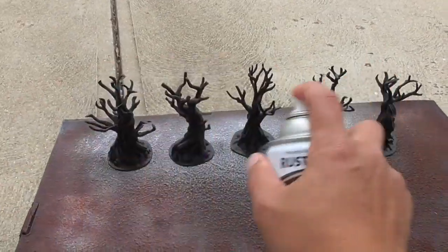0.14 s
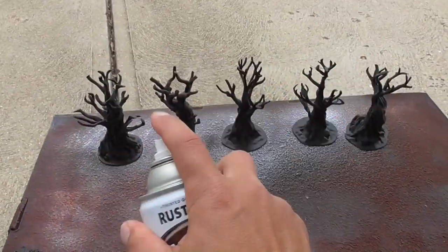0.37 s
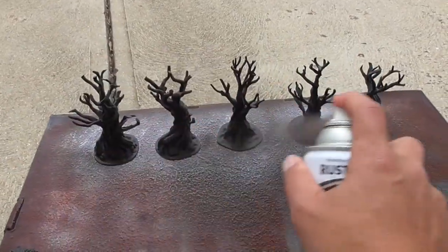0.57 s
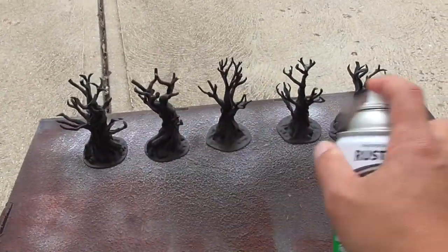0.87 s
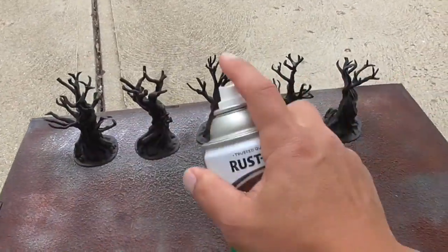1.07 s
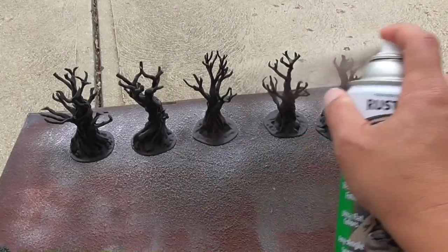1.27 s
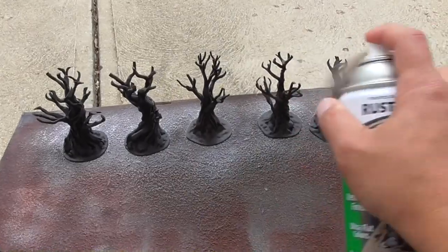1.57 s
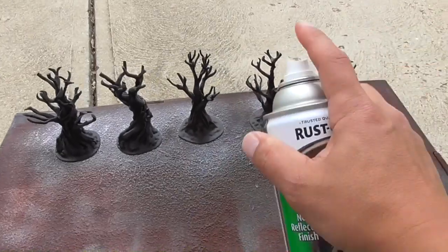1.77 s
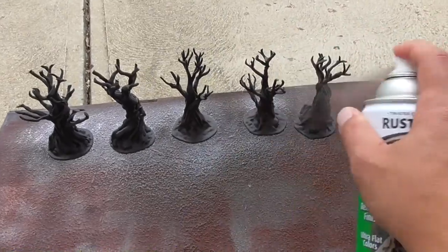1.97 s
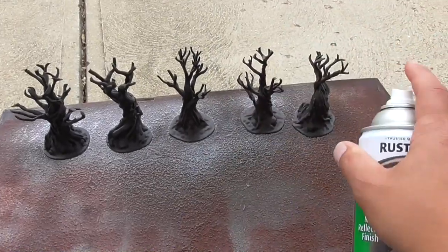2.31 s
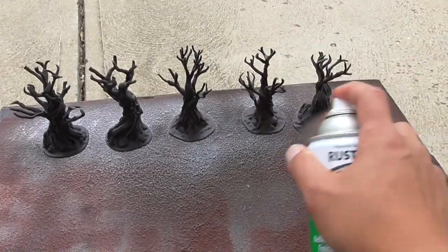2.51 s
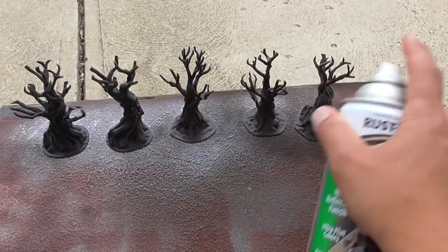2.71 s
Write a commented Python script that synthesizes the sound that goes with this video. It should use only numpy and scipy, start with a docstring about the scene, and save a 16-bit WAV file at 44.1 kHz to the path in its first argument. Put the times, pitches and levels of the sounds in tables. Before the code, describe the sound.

Aerosol paint can hisses in seven short, bright bursts close by outdoors, over distant low rumble

```python
"""Seven short aerosol bursts hiss close by outdoors, over a distant rumble and a thin insect-like treble.
The jet is coloured noise under the valve's envelope; moving reflections off the board comb it.
Valve and finger ticks are resonant noise puffs; a weak hiss weeps on after each burst.
Machinery and traffic are low noise with fuzzy tones and swelling bands; air, insects and crackle
are flickering treble noise. A camera picks it all up with limited bandwidth."""
import sys
import numpy as np
from scipy import signal
from scipy.fft import rfft, irfft, next_fast_len
from scipy.io import wavfile
from scipy.ndimage import uniform_filter1d, map_coordinates

SR = 44100
rng = np.random.default_rng(int(sys.argv[2]) if len(sys.argv) > 2 else 0)


def digitize_waveform(pressure):
    """Quantize a signal to 16-bit integers and store it at the path in sys.argv[1].

    Rows of a 2-D input are taken as channels; values are limited to [-1, 1].
    """
    field = np.atleast_2d(pressure).T
    bounded = np.clip(field, -1, 1)
    quanta = np.round(bounded * 32767).astype(np.int16)
    wavfile.write(sys.argv[1], SR, quanta)


N = 125685
T = np.arange(N) / SR
HALVES = np.array([[0.5], [-0.5]])  # splits a left-minus-right difference over the two channels

# Valve action: (fully open [s], starts to shut [s], level [dB], sag by then [dB], opening step [s],
# after-hiss level [dB], after-hiss t60 [s], after-hiss length [s], bright band boost [dB])
BURSTS = [(0.187, 0.366, -28, -0.5, 0.023, -51, 2, 0.12, 2),
          (0.533, 0.719, -26.5, -4.5, 0.019, -52, 0.39, .3, 0),
          (0.921, 1.092, -28.5, 0, 0.023, -52.5, 1.8, .13, 0.1),
          (1.24, 1.418, -27, -4.5, 0.014, -47.5, 0.39, 0.35, -1),
          (1.616, 1.778, -28, -1.5, 0.015, -52.5, 0.88, .3, -0.4),
          (1.947, 2.091, -27, -5, 0.0084, -49, 0.31, .3, 0.5),
          (2.517, 2.66, -29.5, -1, 0.014, -51.5, .4, .3, 0.5)]
# Stereo likeness of the low background: (frequency [Hz], left-right correlation [-1..1])
RUMBLE_ALIKE = [(60, 0.96), (150, 1), (380, 0.918), (950, 0.69), (2380, 0.83), (9000, 0.18)]


def amp(db):
    """dB to gain."""
    return 10 ** (np.asarray(db) / 20)


def unit(x):
    """Scale to rms 1."""
    return x / np.sqrt(np.mean(x ** 2) + 1e-20)


def along(points, hz, **ends):
    """Interpolate (Hz, value) points on a log-frequency axis."""
    f, v = np.transpose(points)
    return np.interp(np.log(hz + 1), np.log(f + 1), v, **ends)


def curves(rows):
    """One value per sample for each column after the time."""
    time_s, *columns = np.transpose(rows)
    return [np.interp(T, time_s, column) for column in columns]


def wobble(knots_per_s):
    """Smooth random curve: a cubic spline through normal draws."""
    knots = rng.standard_normal(int(N * knots_per_s / SR) + 4)
    return map_coordinates(knots, [T * knots_per_s])


def filtered(x, response):
    """Multiply the spectrum of x by a complex response of frequency."""
    size = next_fast_len(x.shape[-1] + 8192)
    spectrum = rfft(x, size) * response(np.fft.rfftfreq(size, 1 / SR))
    return irfft(spectrum, size)[..., :x.shape[-1]]


def peak(hz, width_hz):
    """Response of a second-order resonance, unity at its centre."""
    return lambda f: 1j * f * width_hz / (hz * hz - f * f + 1j * f * width_hz)


def shape(points):
    """Gain of a (Hz, dB) spectrum that falls away beyond its ends."""
    foot = (points[0][0] * 0.51, -60)
    return lambda hz: amp(along([foot] + list(points), hz, right=-120))


def rush(gain, alike, patchy_db):
    """Stereo noise of rms 1: random time-frequency patches, then colour and left-right correlation."""
    z = signal.stft(rng.standard_normal((2, N)), nperseg=512)[2]
    patches = uniform_filter1d(rng.standard_normal(z.shape[1:]), size=5, axis=0)
    patches = uniform_filter1d(patches, size=8, axis=1)
    pair = signal.istft(z * amp(patchy_db * unit(patches)), nperseg=512)[1][:, :N]

    def mid_side_gain(hz):
        """Mid and side gains whose balance sets the correlation."""
        angle = np.arccos(np.clip(along(alike, hz), -1, 1)) / 2
        return gain(hz) * np.array([np.cos(angle), np.sin(angle)])

    mid, side = filtered(pair, mid_side_gain)
    return unit(np.array([mid + side, mid - side]))


def band(hz, width_hz):
    """Narrow stereo noise through two equal resonances, each width_hz wide."""
    return rush(lambda f: peak(hz, width_hz)(f) ** 2, RUMBLE_ALIKE, patchy_db=0.3)


def rumble():
    """Distant machinery and traffic: slowly wavering low noise."""
    # (frequency [Hz], relative density [dB per Hz])
    rumble_points = [(15, -45), (25, -16), (59, -7), (200, -2.5), (256, -5), (353, -4), (435, -6.5),
                     (516, -12), (600, -9), (797, -9), (844, -10.5), (1000, -12), (1190, -14),
                     (1350, -15.5), (1760, -30.5), (2300, -30.5), (2990, -66), (5060, -120)]
    level_db = -40 + 0.31 * wobble(3.1)
    return amp(level_db) * rush(shape(rumble_points), RUMBLE_ALIKE, patchy_db=0.25)


def drones():
    """Fuzzy tones in the rumble: narrow noise bands, each wavering in level."""
    # (frequency [Hz], width of each resonance [Hz], level [dB])
    drone_rows = [(68.9, 8.1, -53), (118.5, 6.8, -53.5), (856, 35, -55), (450.2, 16, -53)]
    out = np.zeros((2, N))
    for hz, width_hz, db in drone_rows:
        out += amp(db + 0.31 * wobble(4.26)) * band(hz, width_hz)
    return out


def swells():
    """Two low noise bands that swell and sink along set level curves."""
    # (frequency [Hz], width of each resonance [Hz], offset to its level curve [dB])
    swell_bands = [(189.7, 74, -1), (323, 86, -1.5)]
    # (time [s], lower band level [dB], upper band level [dB])
    swell_levels = [(0, -45, -46.5), (.4, -42.5, -43), (.57, -40, -43.5), (.8, -46, -50.5),
                    (1.15, -43, -59), (1.26, -41.5, -45), (1.56, -47.5, -49.5), (1.85, -45.5, -40),
                    (2.2, -44, -40.5), (2.45, -54, -42), (2.66, -42.5, -44.5), (2.85, -52, -45.5)]
    out = np.zeros((2, N))
    for (hz, width_hz, offset_db), level_db in zip(swell_bands, curves(swell_levels)):
        out += amp(offset_db + level_db) * band(hz, width_hz)
    return out


def air():
    """Thin, wavering air hiss."""
    # (frequency [Hz], relative density [dB per Hz])
    air_points = [(1060, -42), (1800, -10.5), (2450, -8.5), (2940, -10.5), (3720, -3.5), (4150, -10),
                  (5810, -10.5), (6540, -4), (7430, -3.5), (8590, -3.5), (9580, -4), (10600, -12),
                  (15800, -20)]
    # (frequency [Hz], left-right correlation [-1..1])
    air_alike = [(1500, 0.8), (3600, 0.8), (6000, .6), (8600, -0.4), (15000, -0.4)]
    level_db = -59 + 0.7 * wobble(4.2)
    return amp(level_db) * rush(shape(air_points), air_alike, patchy_db=1.5)


def insects():
    """Insect-like treble: two noise bands that follow level curves and flicker."""
    # (frequency [Hz], width of each resonance [Hz])
    insect_bands = [(3550, 550), (8620, 380)]
    # (time [s], low band level [dB], high band level [dB])
    insect_levels = [(0, -69, -58), (.15, -69, -65), (.45, -64, -67), (.78, -70, -72), (.88, -65, -58),
                     (1.17, -64, -61), (1.5, -65.5, -74), (1.58, -62.5, -63), (1.83, -65, -64),
                     (1.92, -61, -56), (2.2, -62.5, -60.5), (2.33, -66.5, -72), (2.46, -68, -59),
                     (2.72, -69, -61), (2.85, -66, -66)]
    flicker_db = 1.2
    out = np.zeros((2, N))
    for (hz, width_hz), level_db in zip(insect_bands, curves(insect_levels)):
        out += amp(level_db + flicker_db * wobble(10)) * band(hz, width_hz)
    return out


def crackle():
    """Faint treble crackle: very patchy resonant noise with fast level spikes."""
    hz, width_hz = 10600, 4500
    level_db, spikes_db = -68.5, 3.5
    noise = rush(lambda f: peak(hz, width_hz)(f) ** 2, [(1000, 0.36)], patchy_db=-7)
    return amp(level_db + spikes_db * wobble(140)) * noise


def background():
    """Sum of the low and treble outdoor layers."""
    return rumble() + drones() + swells() + air() + insects() + crackle()


def ticks():
    """Small valve and finger clicks: decaying noise in a broad resonance plus a bright edge."""
    # (start [s], peak level before panning [dB], frequency [Hz], resonance width over frequency [ratio])
    tick_rows = [(0.1386, -48, 9500, 0.42), (0.464, -38, 4800, .6), (0.5165, -23, 4150, 3),
                 (0.8917, -34.5, 4250, 0.16), (1.2204, -40, 4000, 1.1), (1.8482, -42, 8800, .3),
                 (1.914, -49.5, 4300, .3), (2.41, -52, 11000, .4), (2.449, -43, 9250, .4),
                 (2.515, -29, 4250, .12), (2.782, -51, 10300, .25), (2.812, -50, 11000, .4)]
    t60_s, rise_s = 0.023, 0.0005
    snap_db, snap_hz, snap_width_hz = -10, 8800, 5000
    t = T[:2048]
    out = np.zeros(N + len(t))
    snap = peak(snap_hz, snap_width_hz)
    for start_s, db, hz, width_ratio in tick_rows:
        puff = rng.standard_normal(len(t)) * amp(-60 * t / t60_s) * (1 - np.exp(-t / rise_s))
        body = peak(hz, width_ratio * hz)
        click = filtered(puff, lambda f: body(f) ** 2 + amp(snap_db) * snap(f) ** 2)
        out[round(start_s * SR):][:len(t)] += amp(db) * click / np.abs(click).max()
    return out[:N] * amp([[-1.2], [1.2]])  # a little to the right


def valve():
    """Flow gain: the valve cracks, opens with a surge, sags, eases off, shuts and weeps."""
    cracked_db, surge_db, surge_s = -26, 1, 0.023
    taper_s, taper_db = 0.017, -8.5  # finger easing off
    shut_s, shut_db = 0.013, -35  # valve closing
    gain = np.zeros(N)
    for on, off, db, sag, rise, after_db, t60, weep_s, _ in BURSTS:
        eased = off + taper_s
        times = [on - 2 * rise, on - rise, on, off, eased, eased + shut_s, off + 0.047]
        levels = [-70, cracked_db, 0, sag, sag + taper_db, sag + shut_db, -70]
        line_db = np.interp(T, times, levels)
        line_db += surge_db * np.exp(-np.abs(T - on) / surge_s)
        gain += amp(db + line_db) * (line_db > -69)
        weep = amp(after_db - 60 * np.maximum(T - off, 0) / t60) * (T > off)
        gain += weep * np.clip((off + weep_s - T) / 0.014, 0, 1)
    return gain


def jet():
    """Direct hiss: turbulent noise under the valve gain, with a bright band set per burst."""
    # (frequency [Hz], relative density [dB per Hz])
    jet_points = [(880, -11.5), (1500, -16), (1790, -19.5), (2140, -10), (2430, -18), (2700, -11),
                  (3070, -14.5), (3670, -9.5), (4330, -7), (5430, -9.5), (5880, -8.5), (6360, -7.5),
                  (6950, -4.5), (8370, 2), (10600, -1.5), (12600, -4), (15700, -14)]
    # (frequency [Hz], left-right correlation [-1..1])
    jet_alike = [(2000, 1.0), (4000, 0.96), (6500, 0.92), (9400, 0.35), (12000, 1), (15000, 0.32)]
    bright_hz, bright_width_hz = 11600, 3500
    flutter_db = 0.27 * wobble(39.8) + 0.15 * wobble(150)
    hiss = valve() * amp(flutter_db) * rush(shape(jet_points), jet_alike, patchy_db=1.22)
    rows = np.array(BURSTS)
    bright_db = np.interp(T, rows[:, :2].ravel(), rows[:, -1].repeat(2))
    return hiss + (amp(bright_db) - 1) * filtered(hiss, peak(bright_hz, bright_width_hz))


def reflections(direct):
    """Three echoes off board, hand and figures: coloured, phase-turned copies with gliding delays."""
    # (frequency [Hz], gain [dB])
    board_colour = [(2000, -3), (3500, -2), (5300, 2.5), (7500, 2), (9500, 3.5), (11500, -1.5), (15000, 0)]
    # A row per burst, three times: (delay at open [ms], midway [ms], at shut [ms], level at open [dB],
    # at shut [dB])
    path_rows = [(.9, .912, .92, -5, -12, .735, .745, .745, -15, -14, .55, .575, .59, -14, -17),
                 (.875, .882, .87, -8, -10, .69, .73, .72, -17, -13, .425, .455, .455, -15, -18),
                 (.905, .968, 1.005, -11, -8, .56, .55, .55, -13, -19, .64, .65, .685, -22, -14),
                 (1.025, 1.022, 1.0, -8, -11, .615, .605, .62, -14, -18, 1.175, 1.175, 1.14, -15, -16),
                 (1.035, 1.055, 1.07, -12, -9.5, .8, .82, .835, -22, -14, .6, .63, .655, -24, -13),
                 (.98, .982, .99, -15, -11, .76, .76, .755, -12, -20, .59, .605, .6, -13, -18),
                 (.762, .785, .83, -8, -14, .55, .56, .575, -17, -19, 1.25, 1.26, 1.275, -19, -15)]
    turn_rad = 1.4
    turned = filtered(direct.mean(axis=0),
                      lambda hz: np.exp(1j * turn_rad) * amp(along(board_colour, hz)))
    rows = np.array(BURSTS)
    edges_s = rows[:, :2].ravel()
    stops_s = np.linspace(rows[:, 0], rows[:, 1], 3, axis=1).ravel()
    out = np.zeros(N)
    for path in np.split(np.array(path_rows), 3, axis=1):
        delay_ms = np.interp(T, stops_s, path[:, :3].ravel())
        read_at = np.arange(N) - delay_ms * SR / 1000
        level_db = np.interp(T, edges_s, path[:, 3:].ravel())
        out += amp(level_db) * map_coordinates(turned, [read_at], order=5)
    return out


def spray():
    """Jet and reflections comb each other, then get stereo level and phase as the can moves."""
    # (frequency [Hz], left minus right [dB])
    jet_pan = [(2000, -1), (6400, -1), (9800, -3.5), (15000, -4.5)]
    # (frequency [Hz], phase lead of left [rad])
    jet_lead = [(2000, 0.96), (6000, -0.52), (7800, -0.57), (9400, -1.1), (10900, -1.17), (14000, 0.7)]
    # The can's place, a row per burst: (left minus right at open [dB], at shut [dB])
    sweep_rows = [(-0.5, 1.8), (1.5, -1.3), (-1, 1), (0, -.5), (-1.5, 1.1), (-1, -0.42), (-2, 0.9)]
    direct = jet()
    combed = direct + reflections(direct)
    placed = filtered(combed, lambda hz: (amp(HALVES * along(jet_pan, hz))
                                          * np.exp(1j * HALVES * along(jet_lead, hz))))
    edges_s = np.array(BURSTS)[:, :2].ravel()
    return placed * amp(HALVES * np.interp(T, edges_s, np.ravel(sweep_rows)))


def scene():
    """All sources together."""
    return background() + ticks() + spray()


def record(dry):
    """The camera thins the deep bass (second order) and keeps nothing above its band limit."""
    low_hz, top_hz = 43, 15780
    return filtered(dry, lambda hz: (hz < top_hz) * (1j * hz / (low_hz + 1j * hz)) ** 2)


dry = scene()
out = record(dry)
digitize_waveform(out)
```